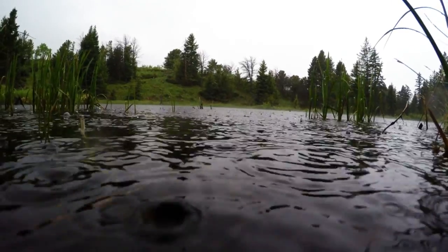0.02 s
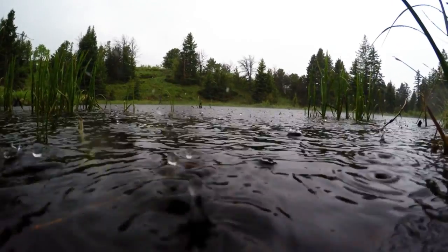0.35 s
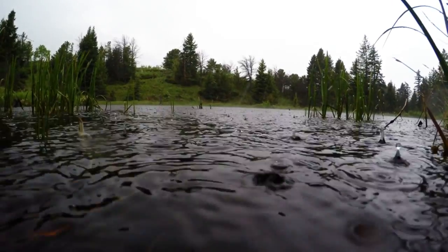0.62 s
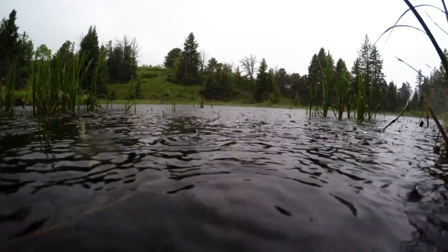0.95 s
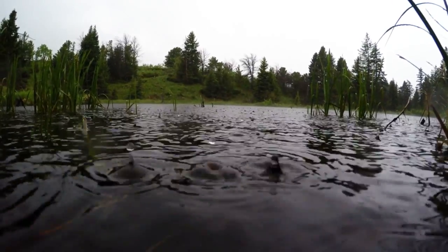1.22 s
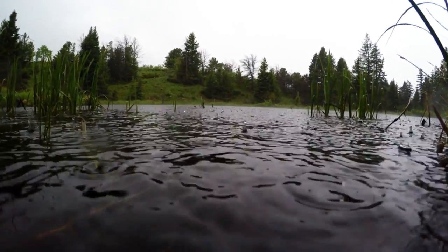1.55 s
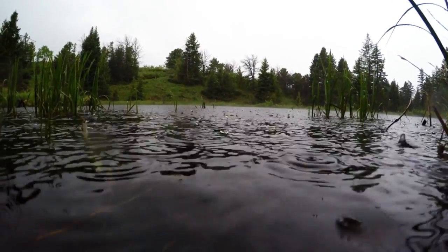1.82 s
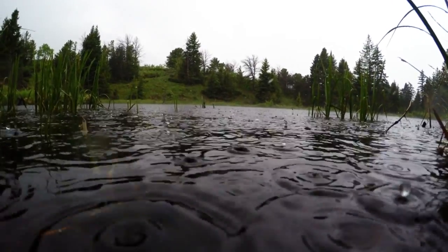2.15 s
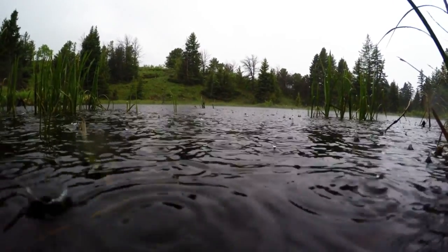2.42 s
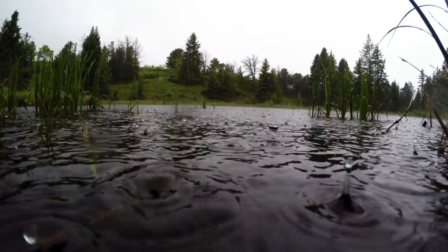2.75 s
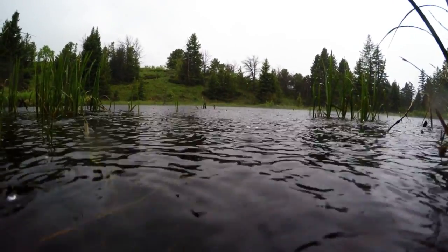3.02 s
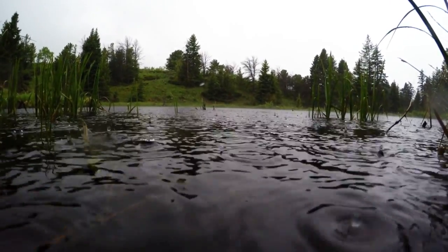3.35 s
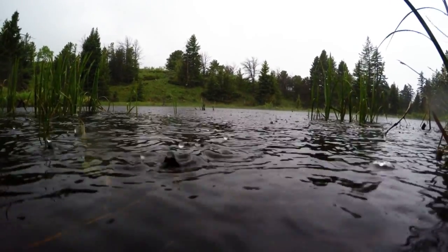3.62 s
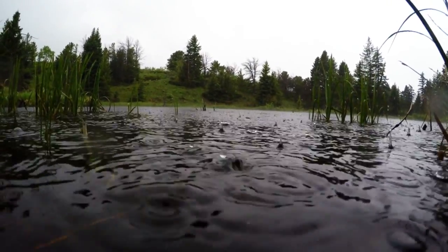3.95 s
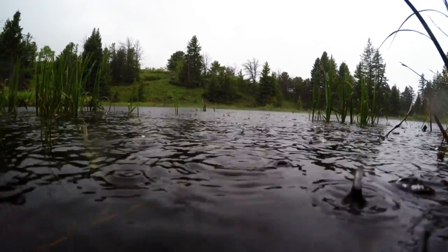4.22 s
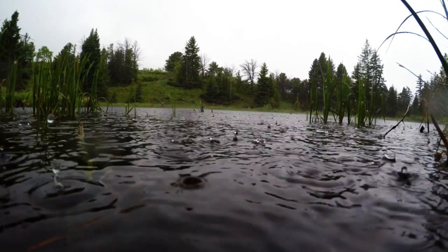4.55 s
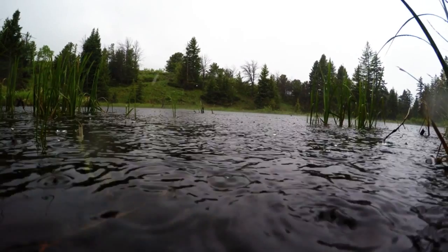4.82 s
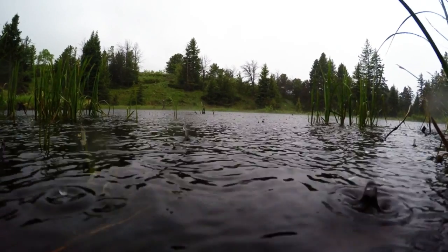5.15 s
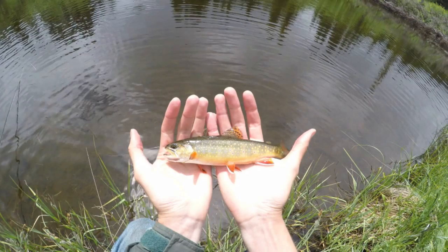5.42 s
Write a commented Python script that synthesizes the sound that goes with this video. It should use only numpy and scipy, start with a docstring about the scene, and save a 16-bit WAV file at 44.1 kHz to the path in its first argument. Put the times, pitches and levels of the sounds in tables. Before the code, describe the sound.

Light rain falls on a pond, heard from a small case just above the water. Faint distant hiss and a low rumble run throughout while single drops pat, tick and plink nearby. Some strike the case with sharp cracks and soft thumps, the loudest just after one second. Heavy drops then knock hollowly beside it among scattered bubble plinks. At the end the sound stutters twice and stops.

```python
"""Light rain on a reedy pond, heard from a small case just above the water.
From the start, far rain hisses over a low rumble, a faint electronic whine and the pips of small drops.
Drops hit the case squarely, throw spray and rock it; others pat the water, tick or trap a ringing bubble.
The hardest hit overloads just after one second; later, heavy drops knock hollowly beside the case.
After five seconds the sound stutters twice and stops."""
import sys
import numpy as np
from scipy import signal
from scipy.fft import rfft, irfft
from scipy.io import wavfile

SR = 44100
rng = np.random.default_rng(int(sys.argv[2]) if len(sys.argv) > 2 else 0)


def to_wav(s):
    """Save 16-bit WAV."""
    ch = np.atleast_2d(s).T  # columns
    pcm = np.round(np.clip(ch, -1, 1) * 32767)  # PCM
    wavfile.write(sys.argv[1], SR, pcm.astype(np.int16))


N = 242529
TIME = np.arange(N) / SR
STOP_S = 5.072   # the rain breaks off and the stutter follows
PAT_LAG_MS, PAT_REBOUND = 1.037, 0.56


def from_db(db):
    """Decibels to amplitude."""
    return 10 ** (np.asarray(db) / 20)


def rms_one(x):
    """Scale to rms 1."""
    return x / np.sqrt(np.mean(x ** 2) + 1e-20)


def add(out, s, sound):
    """Mix a sound in at s seconds."""
    i = max(round(s * SR), 0)
    out[i:i + len(sound)] += sound[:max(N - i, 0)]


def cut(x, hz, kind, order):
    """Butterworth low- or high-pass."""
    return signal.sosfilt(signal.butter(order, min(hz, .45 * SR), kind, fs=SR, output="sos"), x + 1e-18)


def noise(spectrum):
    """Steady noise of a given colour; rms 1."""
    hz, db = np.transpose(spectrum)
    bin_hz = np.maximum(np.arange(N // 2 + 1) * SR / N, 1)
    gain = from_db(np.interp(np.log(bin_hz), np.log(hz), db))
    return rms_one(irfft(rfft(rng.standard_normal(N)) * gain, N))


def damped(hz, t60, rise=0.):
    """A dying sine whose pitch climbs by the share `rise` over its life."""
    t = np.arange(int(t60 * SR)) / SR
    return np.sin(2 * np.pi * hz * t * (1 + rise * t / t60 / 2)) * np.exp(-np.log(1000) * t / t60)


def far_rain(level_db=-64.5):
    """Distant drops blur into a steady hiss."""
    # colour of the hiss: (frequency [Hz], relative density [dB])
    spectrum = [(180, -28), (300, -0.5), (412, -7), (447, -6.5), (645, -4.5), (1010, -6.5), (1100, -6.5),
                (1970, -3), (3240, -1.5), (5340, -11), (14700, -20), (16000, -32.5)]
    return from_db(level_db) * noise(spectrum)


def rumble():
    """A deep bed of noise that gently swells and sinks."""
    # colour of the rumble: (frequency [Hz], relative density [dB])
    spectrum = [(12, -4), (25, 1.5), (42, 1), (62, -6), (100, -14.5), (135, -23.5), (226, -30.5),
                (400, -41.5), (650, -65)]
    # swell of the rumble: (time [s], level [dB])
    swell = [(0.0, -48.5), (0.55, -47), (0.7, -44.5), (1.15, -46), (1.8, -51), (1.93, -45), (2.2, -49),
             (3.4, -46), (3.67, -49), (4.27, -49.5), (4.4, -44), (4.92, -45.5), (5.0, -40.5)]
    return from_db(np.interp(TIME, *np.transpose(swell))) * noise(spectrum)


def whine(pulse_hz=15, depth=.85):
    """Electronics in the case sing thinly, in even pulses of unsteady pitch."""
    # tones of the whine: (pitch [Hz], wander [Hz], level [dB])
    tones = [(7360, 24, -82.5), (14750, 110, -83.5)]
    out = np.zeros(N)
    for hz, wander_hz, db in tones:
        drift = rms_one(cut(rng.standard_normal(N), 2 * wander_hz, "low", order=2))
        pitch = hz + wander_hz * drift
        out += from_db(db) * np.sqrt(2) * np.sin(2 * np.pi * np.cumsum(pitch) / SR)
    return out * (1 + depth * np.cos(2 * np.pi * pulse_hz * (TIME - .05)))


def small_drops(softest_db=-57.5, spread_db=4., centre_hz=2900., octaves=0.74, cycles=16, count=640):
    """Drops farther out land at random, each a soft pip of its own size and pitch."""
    out = np.zeros(N)
    for when, size, pitch in rng.random((count, 3)):
        hz = centre_hz * 2 ** (octaves * (pitch - .5))
        size_db = spread_db * min(-np.log(1 - size), 3.5)   # many small, few large
        add(out, when * STOP_S, from_db(softest_db + size_db) * damped(hz, cycles / hz, rise=0.22))
    return out


def through_case(x):
    """Each resonance of the case lifts or swallows its own band and rings for a few milliseconds."""
    # resonances of the case: (centre [Hz], width [Hz], boost [dB])
    resonances = [(1265, 680, 5.5), (1930, 330, -2), (2230, 228.0, 6.5), (2937, 486.0, 10),
                  (3783, 180, 7.5), (4250, 170, 4.5), (5175, 330, 11.5), (6850, 900, 5), (9000, 430, 5.5)]
    for hz, width, boost_db in resonances:
        radius = np.exp(-np.pi * width / SR)
        poles = [1, -2 * radius * np.cos(2 * np.pi * hz / SR), radius ** 2]
        band = signal.lfilter([1, 0, -1], poles, x + 1e-18) * (1 - radius ** 2) / 2
        x = x + (from_db(boost_db) - 1) * band
    return x


def sprays(bass_hz=800.):
    """Spray thrown up by a drop is a short rush of tiny impacts on the case."""
    # bursts of spray: (time [s], length [s], level before filtering [dB], treble cut [Hz])
    bursts = [(0.01, 0.005, -25.5, 1190), (.448, 0.012, -55, 7000), (.6, 0.006, -31.5, 1900),
              (0.784, 0.0064, -43, 1960), (1.009, .008, -41, 1000), (1.067, 0.01, -49, 2520),
              (1.2207, 0.0077, -33, 3900), (1.444, 0.022, -53.5, 1602), (2.063, .004, -56, 4500)]
    out = np.zeros(N)
    t = TIME[:SR // 20]
    for s, length, db, treble_hz in bursts:
        rush = rng.standard_normal(len(t)) * (t < length)
        add(out, s, from_db(db) * cut(rush, treble_hz, "low", order=2))
    return through_case(cut(out, bass_hz, "high", order=1))


def tap(bass_hz, treble_hz, crack_db, lag_ms, rebound, wet_db=-30.5, wet_s=0.0026):
    """One impact: a soft push with a sharp crack, its rebound and a wash of thrown water; peak 1."""
    n = np.arange(1024)
    wash_age = n / (wet_s * SR)
    wash = from_db(wet_db) * rng.standard_normal(len(n)) * np.exp(-wash_age) * np.minimum(wash_age, 1)
    blow = (n == 0) + wash
    body = cut(blow, treble_hz, "low", order=4)
    push = cut(body + from_db(crack_db) * blow, bass_hz, "high", order=2)
    bounce = rebound * np.interp(n - lag_ms * SR / 1000, n, push, left=0)
    sound = through_case(push + bounce)
    return sound / np.abs(sound).max()


def strike(s, db, contact, ring_db, uneven_db=3.):
    """A drop taps and the case rings in proportion; each landing shakes the modes differently."""
    # short rings of the case: (pitch [Hz], relative level [dB], t60 [s])
    modes = [(2320, -1, 0.049), (1961, -7.5, .03), (2610, -6, 0.012), (3004, -17, 0.06),
             (3630, -13.5, 0.022), (4974, -17, 0.026)]
    out = np.zeros(N)
    add(out, s, from_db(db) * contact)
    for hz, mode_db, t60 in modes:
        level_db = db + ring_db + mode_db + uneven_db * rng.uniform(-1.2, 1)
        add(out, s, from_db(level_db) * damped(hz, t60))
    return out


def hits(ping_hz=1860, ping_t60_s=0.19):
    """Square hits crack loudly and set the case's longest mode singing."""
    # drops on the case: (time [s], level before overload [dB], bass cut [Hz], treble cut [Hz],
    # relative crack [dB], rebound lag [ms], rebound [share], ping level [dB])
    drops = [(0.0114, -15, 514, 1800, -53, 1.46, -0.19, -43),
             (0.586, 0.16, 980, 3600, -21, 1.19, -0.3, -66),
             (1.1374, 14.5, 379.5, 4100, -20.5, 0.44, -0.21, -42),
             (3.1324, -12.5, 2390, 2280, -23.5, 0.72, -0.31, -63),
             (3.7904, 0.2, 2295, 1960, -41.5, 0.67, -0.57, -47.5)]
    out = np.zeros(N)
    for s, db, bass_hz, treble_hz, crack_db, lag_ms, rebound, ping_db in drops:
        out += strike(s, db, tap(bass_hz, treble_hz, crack_db, lag_ms, rebound), ring_db=-39)
        add(out, s, from_db(ping_db) * damped(ping_hz, ping_t60_s))
    return out


def thumps(cycles=6, cutoff_ratio=2.8):
    """Heavy drops and wavelets rock the case briefly; the deeper the thump, the softer its onset."""
    # jolts of the case and its mount: (time [s], level [dB], pitch [Hz])
    jolts = [(0.012, -28.5, 110), (0.238, -35, 96.5), (.601, -36.5, 300), (.648, -27, 69), (1.138, -35, 95),
             (1.224, -33.5, 84), (1.788, -34.5, 258), (2.93, -42.5, 128), (3.347, -31.5, 184),
             (3.419, -34.5, 107), (3.802, -36, 153), (4.41, -41.5, 143), (4.563, -41.5, 124),
             (4.66, -45.5, 232), (4.967, -35.5, 100.7)]
    out = np.zeros(N)
    for s, db, hz in jolts:
        add(out, s, from_db(db) * cut(damped(hz, cycles / hz), cutoff_ratio * hz, "low", order=2))
    return out


def pats(bass_hz=670, crack_db=-36.5):
    """Open water gives way softly: a dull, wet push."""
    # drops on open water: (time [s], level [dB], treble cut [Hz])
    drops = [(0.2341, -21.5, 1550), (0.376, -40, 3020), (0.443, -30.5, 2900), (0.571, -39, 3300),
             (0.6918, -33, 1620), (0.7802, -31, 2310), (0.8387, -34.5, 2300), (1.0622, -34.5, 1800),
             (1.0799, -33.5, 2490), (1.948, -43.5, 2800), (2.2, -45.5, 2030), (2.9463, -43, 1590),
             (3.4168, -32.5, 2800)]
    out = np.zeros(N)
    for s, db, treble_hz in drops:
        contact = tap(bass_hz, treble_hz, crack_db, PAT_LAG_MS, PAT_REBOUND, wet_db=-24., wet_s=.0028)
        out += strike(s, db, contact, ring_db=-27)
    return out


def varied_rebound(lag_ms, share):
    """No two drops land alike: the rebound comes sooner or later, pushing or pulling."""
    late, sign = rng.uniform(-1, 1, 2)
    return lag_ms * 2 ** (late / 2), np.sign(sign) * share


def faint_taps(softest_db=-48., range_db=12., dull_hz=1900., bright_hz=3600., count=14):
    """Drops an arm's length away land now and then, anywhere between a pat and a tick."""
    out = np.zeros(N)
    for when, size, hardness in rng.random((count, 3)):
        treble_hz = dull_hz * (bright_hz / dull_hz) ** hardness
        lag_ms, rebound = varied_rebound(PAT_LAG_MS, PAT_REBOUND)
        contact = tap(bass_hz=1300., treble_hz=treble_hz, crack_db=-25.5,
                      lag_ms=lag_ms, rebound=rebound, wet_db=-17.5, wet_s=0.0031)
        add(out, when * STOP_S, from_db(softest_db + range_db * size) * contact)
    return out


def ticks(usual_db=-29.5, usual_crack_db=-22, crack_per_db=0.38):
    """Small drops tick brightly with little body; the harder they land, the sharper the crack."""
    # small fast drops: (time [s], level [dB], bass cut [Hz], treble cut [Hz])
    drops = [(0.5318, -24.5, 2000, 4400), (0.706, -19, 1800, 3860), (0.8517, -29, 1740, 2280),
             (1.2175, -14.5, 2310, 4540), (1.2551, -33, 1800, 2970), (1.2946, -33, 2360, 3000),
             (1.6333, -39, 2870, 2290), (2.2824, -37, 1400, 3080), (2.9615, -39, 4200, 3800),
             (3.0591, -41.5, 2680, 2440), (3.4911, -21.5, 2500, 4330), (3.5598, -35.5, 2000, 3200),
             (3.695, -36, 4400, 3900), (4.1027, -35, 2230, 3600), (4.4653, -40, 2120, 2530),
             (4.8111, -38, 2010, 4400)]
    out = np.zeros(N)
    for s, db, bass_hz, treble_hz in drops:
        crack_db = usual_crack_db + crack_per_db * (db - usual_db)
        lag_ms, rebound = varied_rebound(lag_ms=.5, share=.25)
        contact = tap(bass_hz, treble_hz, crack_db, lag_ms, rebound, wet_db=-17.5, wet_s=0.0014)
        out += strike(s, db, contact, ring_db=-33)
    return out


def bubbles(cycles=36):
    """A trapped bubble rings briefly, and its note climbs as it nears the surface."""
    # bubbles trapped by drops: (time [s], level [dB], starting pitch [Hz])
    plinks = [(.622, -47, 990), (0.644, -55, 1060), (.672, -62, 1300), (0.798, -56, 1010),
              (2.335, -46, 3300), (2.624, -32, 2890), (2.663, -59, 950), (2.709, -42.5, 3350),
              (3.326, -40, 2560), (3.392, -44, 3770), (4.983, -43, 2280)]
    out = np.zeros(N)
    for s, db, hz in plinks:
        add(out, s, from_db(db) * damped(hz, cycles / hz, rise=0.51))
    return out


def knocks(bass_hz=940):
    """A strong inverted rebound and a loud ring make these taps hollow."""
    # heavy drops right beside the case:
    # (time [s], level [dB], treble cut [Hz], relative crack [dB], relative ring [dB])
    drops = [(1.7841, -15.5, 3000, -28, -26), (1.8993, -22, 2200, -48, -13.5),
             (2.6282, -27.5, 2900, -46, -19.5), (2.7968, -22, 2720, -27, -19.5),
             (3.3444, -29.5, 2380, -48, -19), (4.5529, -37, 2500, -44, -11), (4.957, -22, 2600, -50, -21.5)]
    out = np.zeros(N)
    for s, db, treble_hz, crack_db, ring_db in drops:
        contact = tap(bass_hz, treble_hz, crack_db, lag_ms=0.803, rebound=-0.74,
                      wet_db=-21.5, wet_s=0.0021)
        out += strike(s, db, contact, ring_db)
    return out


def stutter(sound, repeats_at_s=(5.1225, 5.256), repeat_s=.083, click_db=-34., click_s=0.0034):
    """The sound breaks off and its last moment repeats, each time with a click."""
    out = sound * np.clip((STOP_S - TIME) / .006, 0, 1)   # 6 ms fade
    last_moment = out[round((STOP_S - repeat_s) * SR):round(STOP_S * SR)].copy()
    click = from_db(click_db) * np.exp(-TIME[:len(last_moment)] / click_s)
    for s in repeats_at_s:
        add(out, s, last_moment + click)
    return out


def scene():
    """Drops over a bed of far rain and rumble, in mono."""
    bed = far_rain() + rumble()
    near_drops = hits() + knocks() + ticks() + pats() + faint_taps()
    return (bed + near_drops + small_drops() + sprays() + thumps() + bubbles() + whine())[None]


def record(dry, ceiling=.95, hardness=16, cutoff_hz=16300):
    """The hardest taps overload, the ending stutters and the highest treble is cut."""
    clipped = dry[0] / (1 + (dry[0] / ceiling) ** hardness) ** (1 / hardness)
    steep_lowpass = signal.cheby2(16, 70, cutoff_hz, fs=SR, output="sos")
    return signal.sosfilt(steep_lowpass, stutter(clipped))[None]


dry = scene()
out = record(dry)
to_wav(out)
```